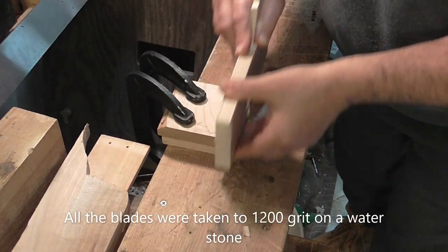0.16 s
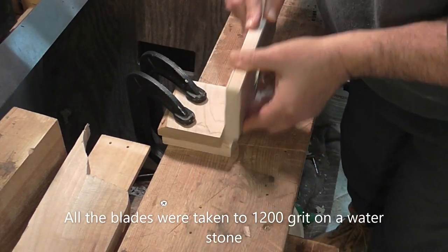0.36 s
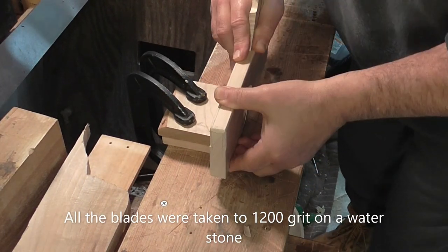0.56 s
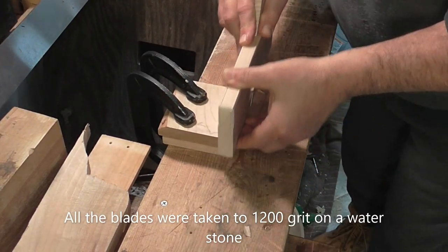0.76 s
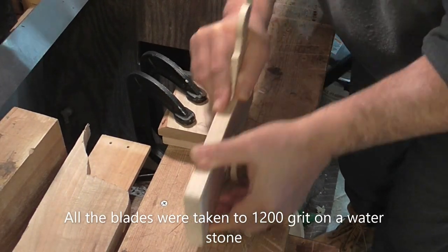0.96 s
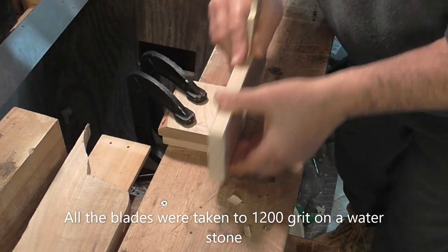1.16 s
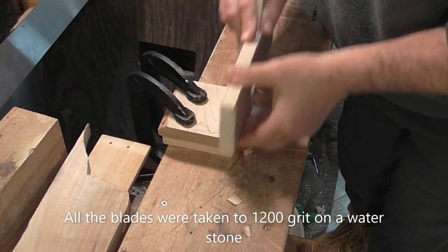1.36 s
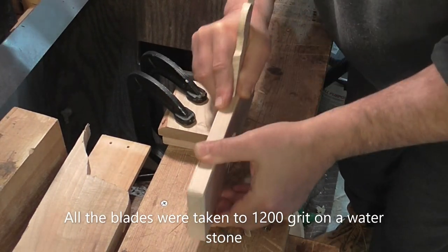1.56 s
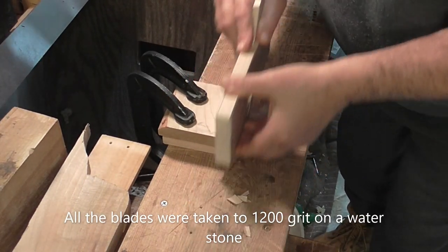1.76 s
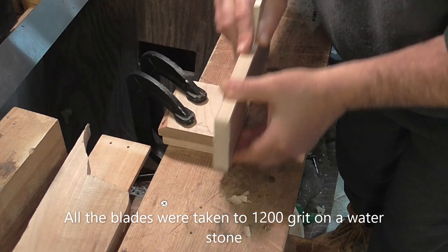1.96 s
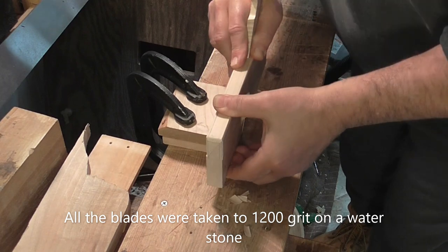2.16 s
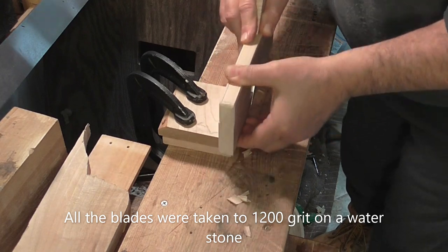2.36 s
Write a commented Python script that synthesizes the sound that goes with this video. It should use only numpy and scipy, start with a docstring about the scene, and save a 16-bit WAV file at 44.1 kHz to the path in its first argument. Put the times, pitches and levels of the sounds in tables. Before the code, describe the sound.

A wooden hand plane shaves wood in quick, short, rasping strokes with light knocks.

```python
"""A wooden hand plane works back and forth over clamped stock on a bench in a small workshop.
Tearing fibres and jolts of the iron ring the plane's body, the bench and the iron,
with hiss from the shaving, thuds from the bench legs and a few bright ticks of snapping chips.
Between cuts the sole slides softly, and the room answers each stroke over a quiet room tone."""
import sys
import numpy as np
from scipy import signal
from scipy.fft import rfft, irfft
from scipy.io import wavfile
from scipy.ndimage import uniform_filter1d

SR = 44100
rng = np.random.default_rng(int(sys.argv[2]) if len(sys.argv) > 2 else 0)


def to_wav(s):
    """Save 16-bit WAV."""
    ch = np.atleast_2d(s).T  # columns
    pcm = np.round(np.clip(ch, -1, 1) * 32767)  # PCM
    wavfile.write(sys.argv[1], SR, pcm.astype(np.int16))


N = 105840

# One table per cut: t/s, body drive level/dB, then bench, iron and hiss level/dB relative to it,
# then ring centre f/Hz of body, bench and iron
CUTS = [
    [(0.205, -42.5, 3, -8, -13, 1700, 594, 5220), (0.215, -17.5, -13, -3, -17.5, 1718, 573, 5030),
     (0.237, -28, -17.5, 1, -11, 1750, 600, 5070), (0.273, -24.5, -15, -2.5, -22, 1790, 587, 5000),
     (0.279, -26, -9, -0.5, -8, 1660, 570, 5650), (0.287, -31, -19, -3, -22, 1620, 586, 5470)],
    [(0.475, -48.5, -7, -19, -20, 1550, 703, 5260), (0.506, -32.5, 4.5, -9, -11, 1490, 737, 5400),
     (0.511, -19, -10, 2, -8, 1406, 700, 5400), (0.516, -29.5, -3, 8.5, -1, 1480, 710, 5300),
     (0.522, -18.5, -9.5, -5, -13, 1450, 690, 4760), (0.545, -24.5, -13.5, -7.5, -20, 1460, 770, 4580),
     (0.561, -26.5, 3.5, -4.5, -10, 1460, 748, 4400), (0.592, -35, -4, -12, -13, 1530, 704, 4700)],
    [(0.79, -58.5, 1, 3, -1, 1670, 585, 5070), (0.824, -38, -7, -6.5, -8, 1700, 586, 4900),
     (0.844, -37, -11, -8.5, -15, 1530, 680, 5300), (0.872, -28, -3.5, -2, -11.5, 1630, 650, 5700),
     (0.899, -31, -1.5, -13, -15, 1630, 550, 5800), (0.908, -36, 1, -20, -24, 1580, 610, 5750)],
    [(0.93, -44, -4, -2, -7, 1680, 644, 5250), (0.962, -42, 8.5, -6, -8, 1580, 613, 5230),
     (0.970, -22.5, -24, 7, -14, 1590, 580, 4820), (0.994, -31.5, -1.5, -31, -2.5, 1670, 540, 5160),
     (1.038, -35.5, -2.5, -8.5, -10.5, 1580, 656, 5330), (1.11, -54, 12, 0, -1, 1720, 785, 4600)],
    [(1.243, -43.5, 8, -10, -18.5, 1750, 690, 5470), (1.255, -24, -15.5, 2.5, -12, 1850, 700, 5500),
     (1.279, -25, -22, 2, -12, 1770, 600, 5500), (1.289, -21.5, -18, -7, -15, 1740, 445, 5370),
     (1.301, -19, 1.5, -10, -18, 1717, 420, 5500), (1.315, -17.5, -26, -3, -21, 1654, 524, 5940),
     (1.337, -34.5, 1, -10, -10, 1700, 656, 5500)],
    [(1.474, -40.5, 1, 12, 2, 1450, 930, 5100), (1.484, -15.5, -5, -5, -17.5, 1400, 930, 5270),
     (1.507, -29.5, -2, 4, -15, 1490, 830, 5230), (1.544, -21, -14, -7.5, -12.5, 1590, 720, 4580),
     (1.576, -29.5, -9, -2, -5.5, 1520, 746, 4100), (1.595, -29.5, 1, -12, -12, 1600, 690, 4770)],
    [(1.813, -34.5, -4.5, -19, -17, 1590, 610, 5350), (1.82, -21, 4, -7.5, -20, 1500, 442, 4860),
     (1.832, -28.5, 3, -3.5, -8, 1540, 417, 5100), (1.86, -19.5, -16, -17, -24, 1720, 573, 5050),
     (1.868, -25.5, -38, -2.5, -15, 1645, 590, 5060), (1.9, -25.5, -45, -9, -11, 1607, 630, 5440),
     (1.912, -16.5, -25, -6.5, -19, 1654, 654, 5640), (1.923, -27.5, -2, -11, -35, 1540, 670, 5500)],
    [(2.046, -31, -7, 5, -16, 1500, 890, 5290), (2.056, -23, -1.5, -2, -12, 1414, 980, 5270),
     (2.078, -27.5, -10, 2.5, -9.5, 1473, 840, 4900), (2.104, -20.5, -24, -11.5, -20, 1544, 576, 5100),
     (2.118, -34, 11, 0, -3.5, 1440, 528, 6000), (2.15, -32, 2, -3, -14, 1530, 545, 6200)],
]


def amp(db):
    return 10 ** (np.asarray(db) / 20)


def unit_rms(x):
    return x / np.sqrt(np.mean(x ** 2) + 1e-20)


def eq(x, points, to_gain=amp):
    """Filters by a curve on a log-frequency axis."""
    f, value = np.transpose(points)
    hz = np.fft.rfftfreq(x.shape[-1], 1 / SR)
    return irfft(rfft(x) * to_gain(np.interp(np.log(hz + 1), np.log(f + 1), value)), x.shape[-1])


def band(x, points):
    """Colours by a dB curve with steep skirts; unit RMS out."""
    (low, low_db), (high, high_db) = points[0], points[-1]
    return unit_rms(eq(x, [(low * .7, low_db - 40), *points, (high * 1.3, high_db - 40)]))


def butter(x, order, hz, kind):
    return signal.sosfilt(signal.butter(order, hz, kind, fs=SR, output="sos"), x)


def envelopes(tables, count):
    """Gain curves from a level column and those relative to it; silent outside the tables."""
    t, gains = np.arange(N) / SR, np.zeros((count, N))
    for rows in tables:
        s, db, *relative = np.transpose(rows)[:count + 1]
        gains += ((t >= s[0]) & (t <= s[-1])) * amp([np.interp(t, s, db + r) for r in [0] + relative])
    return gains


def flutter(width):
    """Random wobble, smoothed over width samples."""
    return unit_rms(uniform_filter1d(uniform_filter1d(rng.standard_normal(N), width), width))


def ring(x, modes):
    """Rings a set of damped modes; unit power gain for noise."""
    t = np.arange(6000) / SR
    impulse = sum(amp(db - 60 * t / t60) * np.sin(2 * np.pi * hz * t) / np.sqrt(t60)
                  for hz, db, t60 in modes)
    return signal.oaconvolve(x, impulse / np.linalg.norm(impulse))[:N]


def sweep(x, hz, width_hz):
    """Moving resonance: shift down, smooth, shift back."""
    carrier = np.exp(2j * np.pi * np.cumsum(hz) / SR)
    pole = np.exp(-np.pi * width_hz / SR)
    return 2 * (carrier * signal.lfilter([1 - pole], [1, -pole], x / carrier)).real


def fibres(snaps_per_s=7000, size_db=1.8, chatter_db=2.2, chatter_s=0.004):
    """Fibres tear in dense, uneven snaps, clumped by the chatter of the iron."""
    sizes = amp(size_db * np.minimum(rng.exponential(1, N), 3.)) * rng.standard_normal(N)
    snaps = sizes * (rng.random(N) < snaps_per_s / SR)
    return unit_rms(snaps * amp(chatter_db * flutter(round(chatter_s * SR))))


def sole_slide():
    """The sole rubs unevenly along the wood: grainy noise in three bands."""
    # One table per slide: t/s, low rub level/dB, then treble and top swish level/dB relative to it
    slides = [
        [(0.0, -44, -10, -17), (0.044, -48.5, -10.5, -21), (0.048, -53, -7, -13), (0.205, -45, 0, -6.5)],
        [(0.288, -33.5, -9, -18), (0.398, -50.5, -1.5, -10), (0.414, -52, -6.5, -20), (0.5, -41, -4, -10)],
        [(0.6, -36.5, -30, -36), (0.684, -48, -15, -45), (0.764, -60, -13, -18), (0.8, -61.5, 9, 10)],
        [(1.1, -50.5, -5, -8), (1.126, -43, -18, -27), (1.136, -48.5, -9.5, -18.5), (1.245, -42, -1, -6.5)],
        [(1.36, -41.5, -32, -22), (1.422, -52, -15, -27), (1.45, -46, -7, -14), (1.47, -34.5, -13, -26)],
        [(1.61, -37, -10.5, -25), (1.716, -56.5, -6, -17), (1.73, -57.5, -3.5, -9.5), (1.81, -43.5, -7, -13)],
        [(1.96, -52, -30, -27), (2.004, -55, -2, -26), (2.04, -48, -9.5, -11), (2.045, -55, -5, -21)],
        [(2.15, -40, -9, -31), (2.252, -51.5, -20, -44), (2.258, -68, -23, -27), (2.33, -70, -20, -19)],
        [(2.342, -62, -2, 4), (2.348, -54.5, -3, 2.5), (2.384, -43, -4, -2.5), (2.4, -39, -7, -10)],
    ]
    # Spectra of the three bands: f/Hz, level/dB
    low = [(59, -71), (100, -7.5), (267, -1), (722, 2.5), (862, -2.5), (1060, 1), (1210, -4), (1570, 0),
           (2600, -22), (3380, -40), (5720, -120)]
    treble = [(1530, 5), (2600, -5.5), (3670, 0), (4270, 4), (4700, -3.5), (7000, -4), (9100, -13),
              (15400, -120)]
    swish = [(4120, -16), (7000, -6), (10300, 0.5), (12300, -10.5), (15500, -14)]
    gains = uniform_filter1d(envelopes(slides, 3), 200)
    rub = fibres() + 2.6 * rng.standard_normal(N)
    uneven = amp(2.2 * flutter(600))
    return uneven * sum(gain * band(rub, colour) for gain, colour in zip(gains, (low, treble, swish)))


def room_tone(level_db=-54.5):
    """Quiet, dark air, mostly common to both sides."""
    # Air spectrum: f/Hz, level/dB
    colour = [(18, -39), (50, -8.5), (359, -4.5), (432, -9), (1140, -8), (1590, -11), (2550, -28.5),
              (4540, -23), (12600, -37.5), (15500, -44)]
    noise = rng.standard_normal((3, N))
    return amp(level_db) * band(noise[0] + 0.6 * noise[1:], colour)


def cutting(legs_db=-16.5):
    """Tearing fibres drive body, bench, iron and shaving; the legs take a share of the bench's drive."""
    tearing = [fibres() for _ in range(3)]
    hiss = unit_rms(fibres() + 0.89 * rng.standard_normal(N))
    drive = envelopes(CUTS, 4) * np.array(tearing + [hiss])
    return np.vstack([drive, amp(legs_db) * drive[1]])


def plane_body(drive, hz, width_hz=440, upper_ratio=1.275):
    """The wooden body rings, brought forward in two moving bands."""
    # Body modes: f/Hz, level/dB, t60/s
    modes = [(1339, 6, 0.012), (1506, 2, 0.013), (1594.6, 0.5, 0.11), (1735, -34.5, 0.034),
             (1761, 2.5, 0.011), (1994, -5, 0.017), (2213, 2, 0.0067), (2106, 3.5, 0.0071),
             (2323, 3.5, 0.0037)]
    rung = ring(drive, modes)
    lower, upper = (sweep(sweep(rung, f, width_hz), f, width_hz) for f in (hz, upper_ratio * hz))
    return 1.44 * (lower - amp(-3) * upper) + amp(-10) * rung


def bench(drive, hz, width_hz=452):
    """The bench knocks in the low mids, brought forward in one moving band."""
    # Bench modes: f/Hz, level/dB, t60/s
    modes = [(290, 0, 0.093), (370, -1, 0.16), (416, -7.5, 0.12), (534, 1.5, 0.039), (602, 7.5, 0.029),
             (718.6, 7, 0.042), (806, 6, 0.023), (983, 4.5, 0.0087), (1053, 14.5, 0.023)]
    rung = ring(drive, modes)
    return 1.246 * sweep(sweep(rung, hz, width_hz), hz, width_hz) + amp(-4.5) * rung


def iron(drive, hz):
    """The iron's short, bright ring, with a moving peak."""
    # Iron modes: f/Hz, level/dB, t60/s
    modes = [(3160, -3, .016), (3570, -10, .008), (3900, -10, .008), (4300, -6, .007), (4660, -3, .008),
             (5000, -2, .007), (5320, 0, .011), (5600, -1, .007), (6000, -5, .006), (6430, -6, .009),
             (6900, -8, .006), (8500, -9, .006)]
    rung = ring(drive, modes)
    return butter(0.69 * sweep(rung, hz, width_hz=374) + amp(-2.5) * rung, 2, [2700, 8400], "band")


def shaving(drive):
    """The shaving hisses as it peels off."""
    # Hiss spectrum: f/Hz, level/dB
    colour = [(3820, -14), (6500, -3), (6990, -6), (11100, -13.5), (13800, -18.5), (15500, -27)]
    return band(drive, colour) * np.sqrt(np.mean(drive ** 2))


def bench_legs(drive):
    """The legs thud under the cut."""
    # Leg modes: f/Hz, level/dB, t60/s
    modes = [(60, -8, 0.19), (101, -22, 0.055), (146, 13, 0.11), (211, 13.5, 0.11)]
    return butter(ring(drive, modes), 2, [65, 260], "band")


def jolts(body_hz, bench_hz, trim_db=-12, knock_db=-12, thud_db=-22):
    """The iron catches: a gritty knock at the body and bench centres, grit above, a push on the legs."""
    # Catches: t/s, body level/dB, then bench, iron, hiss and thud level/dB relative to it, rise/ms
    catches = [(0.2140, 3, -17.5, -22, -31, -10.5, 0.69), (0.4157, -31.5, 8.5, -20, -23, -18, 1.55),
               (0.4830, -30, 6, -12, -15, -20, 1.5), (0.5093, -2.5, -11, 2, -19, -45, 1.6),
               (0.5204, -3.5, -31, 2, -4, -4.5, 1.47), (0.5490, -26.5, 11, -7, -25, -37, 1.2),
               (0.5570, -13, 12, -8, -28, -37, 1.35), (0.8215, -27, -28, -1.5, -2, -28, 2.8),
               (0.9392, -25.5, 3, -4, -22, 11.5, 2.3), (0.9655, -21, -18, 11, 0.5, -24, 3),
               (0.9972, -8, -16, -19, -14, -7.5, 0.72), (1.0844, -33, -3, -6, -4, -9, 1.2),
               (1.2534, -10, -33, -16, -5, -36, 0.67), (1.2966, -10, 3, -18, -26, -44, 1.4),
               (1.4834, -3, -12.5, -7.5, -34, -15.5, 1.3), (1.7865, -40.5, 15, -7, -9, 1, 2),
               (1.8200, -7, 1, -29, -40, -22, 1.5), (1.8572, 0.5, -33, -11, -34, -19, 1.5),
               (1.8788, -1, -40, -28, -32, -28, 1.7), (1.8935, 2.5, -32, -16, -30, -43, 0.85),
               (1.8990, -3, -36, -19, -30, -45, 0.87), (1.9070, 5.5, -26, -26, -29, -48, 0.9),
               (1.9140, 1, -17, -20, -25, -45, 1.1), (2.0544, -8, -19, -23, -10, -39, 1.7),
               (2.086, -5.5, -10, -13, -23, -44, 1.2), (2.105, -10, -3.5, -16, -23, -44, 1.9),
               (2.1150, -20.5, 13, -4, -20, -30, 2.4), (2.2804, -53, 22.5, -10.5, -8, -11, 1.7)]
    length = 800
    t, drive = np.arange(length) / SR, np.zeros((5, N))
    grits = np.sign(rng.standard_normal((len(catches), 4, length)))
    for (s, db, *relative, rise_ms), grit in zip(catches, grits):
        at = round(s * SR)
        age = t * 1000 / rise_ms
        pulse = 2 * age * np.exp(-age)
        knock = amp(knock_db) * np.sin(2 * np.pi * np.outer([body_hz[at], bench_hz[at]], t))
        force = np.vstack([knock + 0.3 * grit[:2], grit[2:], np.full(length, amp(thud_db))])
        drive[:, at:at + length] += amp(trim_db + db + np.array([0] + relative)[:, None]) * force * pulse
    return drive


def plane():
    """Cuts and jolts drive every part; the rings shift as the plane travels."""
    t, rows = np.arange(N) / SR, np.vstack(CUTS)
    body_hz, bench_hz, iron_hz = (np.interp(t, rows[:, 0], hz) for hz in rows.T[-3:])
    to_body, to_bench, to_iron, to_shaving, to_legs = cutting() + jolts(body_hz, bench_hz)
    wood = butter(plane_body(to_body, body_hz) + bench(to_bench, bench_hz), 3, 134, "high")
    return wood + iron(to_iron, iron_hz) + shaving(to_shaving) + bench_legs(to_legs)


def chips(decay_s=0.0002):
    """Each chip snaps off with a tiny bright tick."""
    # Ticks: t/s, peak level/dB, f/Hz
    ticks = [(0.8055, -32, 10500), (0.8226, -30, 4470), (0.9393, -44, 11500), (0.9968, -14, 11200),
             (1.0014, -18, 9100), (1.0245, -32, 11500), (1.913, -23, 7560)]
    out, t = np.zeros(N), np.arange(-40, 200) / SR
    for s, db, hz in ticks:
        at = round(s * SR)
        out[at:at + len(t)] += amp(db) * np.exp(-abs(t) / decay_s) * np.cos(2 * np.pi * hz * t)
    return out


def stereo_width(x):
    """A smeared copy, added left and subtracted right, widens the sound."""
    # Stereo image: f/Hz, left-right correlation
    likeness = [(90, 0.72), (180, 1), (550, 0.96), (1650, 0.95), (4970, 0.97), (15000, 0.71)]
    taps = rng.choice([-1., 1.], 1500) * np.exp(-np.arange(1500) / 400)
    smeared = signal.oaconvolve(x, taps / np.linalg.norm(taps))[:N]
    side = eq(smeared, likeness, lambda c: np.sqrt((1 - c) / (1 + c)))
    return np.array([x + side, x - side])


def workshop(x, level_db=-8, mid_gain=0.95):
    """Sparse room echoes, each band dying at its own speed, partly alike on both sides."""
    # Room decay: f/Hz, t60/s
    decay = [(200, 0.44), (530, 0.36), (1390, 0.31), (3680, 0.36), (9700, 0.31)]
    # Reverb send EQ: f/Hz, level/dB
    colour = [(200, 2), (1600, 0.5), (5000, -2), (10000, -4)]
    taps = np.zeros((2, SR // 2))
    slots = np.arange(200, SR // 2 - 20, 20)
    at = slots + rng.integers(0, 20, (2, len(slots)))
    np.put_along_axis(taps, at, rng.choice([-1., 1.], at.shape), 1)
    hz, t, spectra = signal.stft(taps, SR, nperseg=256)
    t60 = np.interp(hz, *np.transpose(decay))[:, None]
    mid, side = signal.istft(spectra * amp(-60 * t / t60), SR, nperseg=256)[1]
    side *= np.sqrt(1 - mid_gain ** 2)
    tail = (mid_gain * mid + np.array([side, -side])) / np.linalg.norm(mid)
    return amp(level_db) * signal.fftconvolve(eq(x, colour)[None], tail, axes=1)[:, :N]


def scene():
    """The plane up close, with the room around it."""
    near = plane() + chips() + sole_slide()
    return stereo_width(near) + workshop(near) + room_tone()


def record(dry, cutoff_hz=15800):
    """Two close microphone ports of slightly different colour, then a low-pass."""
    # Port balance: f/Hz, left minus right level/dB
    balance = [(60, -3.5), (180, 1.5), (550, -1.1), (1650, 0.2), (4970, 0.6), (15000, -1)]
    left = eq(dry[0], balance, lambda db: amp(db / 2))
    right = eq(dry[1], balance, lambda db: amp(-db / 2))
    lowpass = signal.firwin(511, cutoff_hz, window=("kaiser", 9), fs=SR)
    return signal.oaconvolve(np.array([left, right]), lowpass[None], "same")


dry = scene()
out = record(dry)
to_wav(out)
```